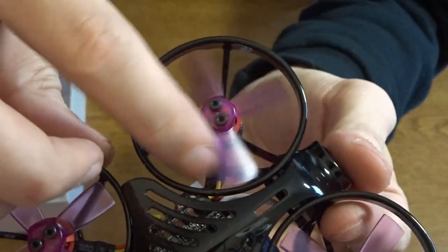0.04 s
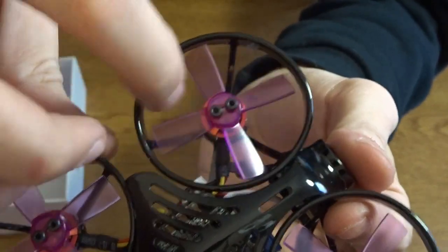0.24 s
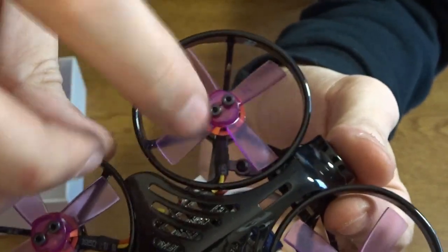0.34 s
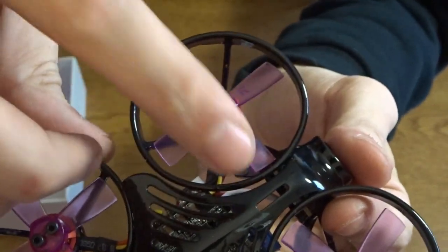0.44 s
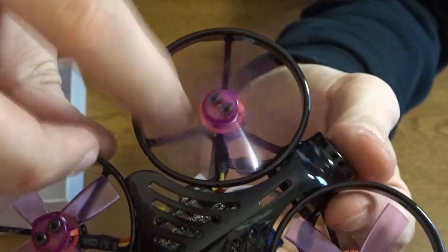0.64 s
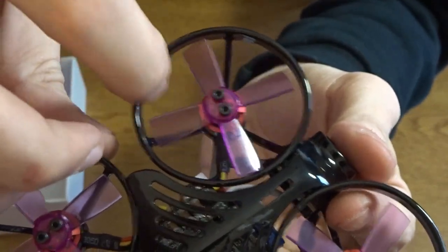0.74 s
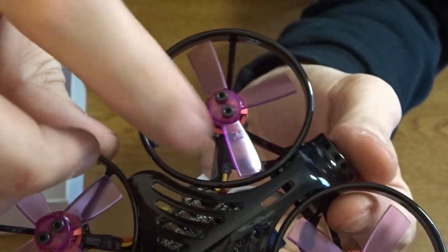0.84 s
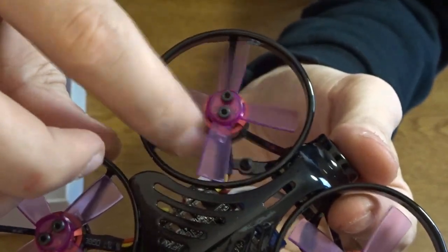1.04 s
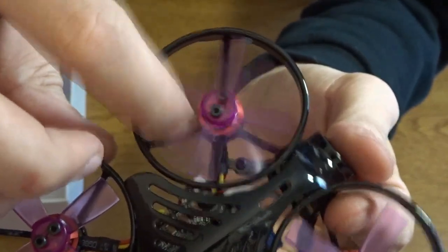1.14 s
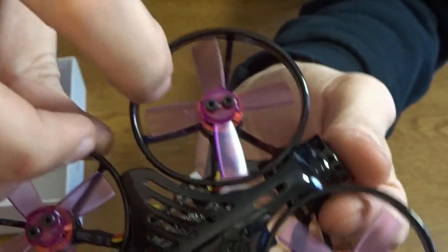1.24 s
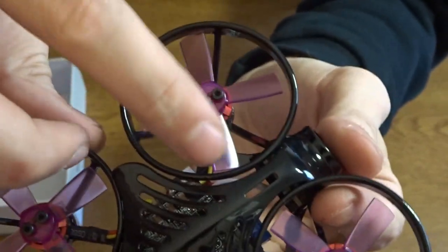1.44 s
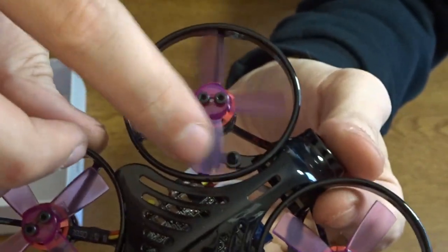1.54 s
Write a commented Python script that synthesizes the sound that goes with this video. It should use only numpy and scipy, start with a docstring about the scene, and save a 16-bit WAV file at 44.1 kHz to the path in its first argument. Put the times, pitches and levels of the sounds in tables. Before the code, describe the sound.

Close up in a small quiet room, plastic propeller blades click and twang under a finger three times at an even pace, with tiny rattles against the guard, faint skin rubs and a very low airy hum.

```python
"""A finger turns the plastic propeller of a small drone three times, close by in a quiet room.
Fan-like hum and hiss, shaped noise and wavering sines, lie faintly under everything. Skin first rubs softly.
In each turn the nail ticks on a blade, which it damps, then scrapes over the edge with a burst of noise;
the blade snaps free and rings as decaying sines. The loose propeller knocks on its guard twice after
the first turn and once after the second. Faint rubs and thuds of the hand recur, and a short room tail follows."""
import sys
import numpy as np
from scipy import signal
from scipy.fft import rfft, irfft
from scipy.io import wavfile

SR = 44100
rng = np.random.default_rng(int(sys.argv[2]) if len(sys.argv) > 2 else 0)


def wav_record(signal):
    """Record a signal, one row per channel, as 16-bit PCM in the file named by sys.argv[1]."""
    frames = np.transpose(np.atleast_2d(signal))
    bounded = np.clip(frames, -1, 1)
    # unit amplitude maps onto the largest positive 16-bit level
    quanta = np.round(bounded * 32767).astype(np.int16)
    wavfile.write(sys.argv[1], SR, quanta)


N = 70560
T = np.arange(N) / SR  # time [s]
OVERTONE_HZ, OVERTONE_T60_S = 4338, 0.059  # second long mode of the free blade


def undb(db):
    """Level definition: decibels to amplitude ratio."""
    return 10 ** (np.asarray(db) / 20)


def spectrum_gain(colour):
    """Spectral envelope: gain per FFT bin, interpolated in dB over log frequency."""
    hz, db = np.array(colour).T
    f = np.maximum(np.fft.rfftfreq(N, 1 / SR), 1)
    return undb(np.interp(np.log(f), np.log(hz), db))


def noise(colour):
    """Spectral shaping: white Gaussian noise filtered to a colour and scaled to rms 1."""
    white_spectrum = rfft(rng.standard_normal(N))
    y = irfft(white_spectrum * spectrum_gain(colour), N)
    return y / np.std(y)


def decay(age, t60):
    """Exponential damping: amplitude falls by 60 dB in every t60."""
    return np.exp(-np.log(1000) * age / t60)


def fade(start, t60):
    """Free decay: silence until the start, then exponential damping."""
    return (T >= start) * decay(np.maximum(T - start, 0), t60)


def swell(start, length):
    """Gradual contact: a half-sine rise and fall."""
    return np.sin(np.pi * np.clip((T - start) / length, 0, 1))


def mode(start, hz, t60, rise=0.00021, hold=0):
    """Damped resonance: a sine that rises, holds and decays exponentially."""
    age = np.maximum(T - start, 0)
    onset = 1 - np.exp(-age / rise)
    return np.sin(2 * np.pi * hz * age) * onset * decay(np.maximum(age - hold, 0), t60)


def ring(start, modes, scatter_db):
    """Modal superposition: each blow shares its strength a little differently among the modes."""
    total = 0
    for hz, db, t60 in modes:
        gain = undb(db + scatter_db * rng.standard_normal())
        delay = rng.random() / hz  # up to one period
        total = total + gain * mode(start + delay, hz, t60)
    return total


def burst(colour, env):
    """Amplitude modulation: noise under an rms envelope, scaled to exactly the envelope's energy."""
    y = noise(colour) * env
    return y * np.linalg.norm(env) / np.linalg.norm(y)


def click(colour, start):
    """Impulsive contact: a causal minimum-phase pulse of the given colour plus a rough noise decay."""
    rough_t60_s, rough_db = 0.0076, -2  # level against the pulse
    # folding the cepstrum onto positive times makes the pulse causal
    cepstrum = irfft(np.log(spectrum_gain(colour)), N)
    folded = 2 * cepstrum * (T > 0) * (T < T[-1] / 2)
    pulse = irfft(np.exp(rfft(folded)), N)
    rough = burst(colour, fade(start, rough_t60_s))
    placed = np.roll(pulse, int(start * SR)) / np.linalg.norm(pulse)
    return placed + undb(rough_db) * rough / np.linalg.norm(rough)


def stereo(mid, side):
    """Mid-side sum and difference: left and right from the common and the differing part."""
    return np.array([mid + side, mid - side])


def background(waver=0.11):
    """Broadband flow noise and phase-modulated tones: air and a wavering hum, a little to the right."""
    # noise spectra common to both ears and differing between them: (frequency [Hz], relative density [dB])
    air_mid = [(25, -46), (70, -31.5), (180, -21.5), (270, -15), (370, -5), (470, -9.5), (560, 1),
               (640, -2), (850, -1.5), (1080, -13.5), (1300, -4), (1600, -7.5), (2100, -15.5), (2900, -22),
               (5000, -21.5), (9000, -25.5), (15500, -25.5)]
    air_side = [(25, -57), (110, -34), (220, -25.5), (370, -7.5), (600, -7), (800, 2), (1080, -11.5),
                (1500, -5), (2100, -9), (2800, -21), (7500, -29), (10000, -44), (15500, -56)]
    # hum tones: (frequency [Hz], rms level before the left-right balance [dB])
    hum_tones = [(350, -72), (389, -64)]
    # spectrum of the rush in the right ear: (frequency [Hz], relative level [dB])
    fan_colour = [(300, -27), (700, -4), (1000, -31), (1350, 9.5), (1650, 12.5), (2100, -28), (5000, -62)]
    air_mid_db, air_side_db, fan_db = -57, -58, -61
    left_db = -0.5  # left against right
    drift = [(1, 0), (6, 0), (30, -40), (200, -120)]  # slow phase noise: (frequency [Hz], relative level [dB])
    hum = 0
    for hz, db in hum_tones:
        phase = 2 * np.pi * (hz * T + rng.random()) + waver * noise(drift)  # waver: rms [rad]
        hum = hum + undb(db) * np.sqrt(2) * np.sin(phase)
    air = stereo(undb(air_mid_db) * noise(air_mid) + hum, undb(air_side_db) * noise(air_side))
    balance = undb(np.array([[left_db], [-left_db]]) / 2)
    fan = undb(fan_db) * noise(fan_colour) * np.array([[0], [1]])  # right only
    return air * balance + fan


def room(x):
    """Diffuse reverberation: convolution with decaying noise, nearly the same in both ears."""
    # spectrum of the tail: (frequency [Hz], relative level [dB])
    tail_colour = [(100, -10), (600, -15), (850, -15), (1300, 3), (2500, 8), (3600, 2.5), (4350, -5),
                   (5200, 2.5), (6500, -1), (9000, 1), (12000, -5), (15500, -4)]
    t60_s, gap_s, tail_db, side_db = 0.3, 0.0031, -13.5, -11.5
    tails = [noise(tail_colour) * fade(gap_s, t60_s) for _ in range(2)]
    mid, side = (signal.fftconvolve(x, h / np.linalg.norm(h))[:N] for h in tails)
    return undb(tail_db) * stereo(mid, undb(side_db) * side)


def handling():
    """Friction and soft contact: skin rubs on plastic and the holding hand shifts with a thud."""
    # rubs and thuds: (start [s], length [s], peak rms level [dB])
    brushes = [(0.023, 0.021, -60.5), (0.994, .05, -67), (1.17, 0.03, -60)]
    thuds = [(0.208, .035, -77), (0.678, .035, -80), (0.784, 0.051, -74.5), (1.19, 0.029, -84)]
    # their noise spectra: (frequency [Hz], relative level [dB])
    brush_colour = [(1500, -22), (3300, -17), (4300, 7.5), (5500, -8), (9500, -16), (12000, 7.5),
                    (15000, -28)]
    thud_colour = [(30, -9), (70, -21), (115, 20), (170, -13), (400, -35), (2000, -70)]
    rubs = sum(undb(db) * noise(brush_colour) * swell(t, length) for t, length, db in brushes)
    return rubs + sum(undb(db) * noise(thud_colour) * swell(t, length) for t, length, db in thuds)


def touches():
    """Damped impact: the nail lands with a thin tick and the finger quickly damps the blade."""
    # landings of the nail: (time [s], relative level [dB])
    landings = [(0.1212, -34), (0.6304, -34), (1.0761, -29)]
    # the blade while the nail holds it: (frequency [Hz], relative level [dB], t60 [s])
    held_modes = [(1830, -13.5, 0.028), (3534, -7, 0.018), (4570, -17, .02), (6070, -10.5, 0.0095),
                  (6740, -15, 0.014), (9500, -12, 0.011), (12900, -2, .009)]
    # spectrum of the tick: (frequency [Hz], relative level [dB])
    tick_colour = [(1500, -32.5), (3400, -18.5), (4600, -18), (7000, -14), (8600, -27), (11000, -11),
                   (12000, 8.5), (12900, -2.5), (13700, -30), (15500, -28)]
    out = 0
    for t, db in landings:
        held_ring = undb(0.2) * ring(t, held_modes, scatter_db=0.9)
        tick = undb(13.0) * click(tick_colour, t)
        out = out + undb(db) * (held_ring + tick)
    return out


def body(start, modes):
    """Impulse response: a hard blow wakes short plastic modes and a faint buzz of the loose frame."""
    # spectrum of the buzz: (frequency [Hz], relative level [dB])
    buzz_colour = [(500, -17), (2400, -3.5), (3300, -6), (5000, 3), (9000, 0), (13500, -0.5), (15500, -1)]
    buzz_db, buzz_t60_s = -19.5, 0.11
    buzz = undb(buzz_db) * burst(buzz_colour, fade(start, buzz_t60_s))
    return undb(1.5) * ring(start, modes, scatter_db=0.2) + buzz


def knocks():
    """Collision of resonators: hard clicks on the guard also wake the blade's overtone."""
    # blows of the freed propeller: (time [s], relative click level [dB], overtone level [dB])
    blows = [(0.2269, -22, -36.5), (0.7019, -24, -33.5), (0.3224, -44, -43)]
    # the guard, struck by a blade: (frequency [Hz], relative level [dB], t60 [s])
    guard_modes = [(4420, -14.5, 0.053), (4600, -13, 0.037), (6280, -8, .014), (7700, -11.5, 0.011),
                   (8270, -20, 0.016), (11220, -13, 0.014), (11580, -4, 0.017)]
    # spectrum of the click: (frequency [Hz], relative level [dB])
    knock_colour = [(60, -59), (500, -27), (1100, -7.5), (2400, -14), (3500, -31), (4500, -11.5), (6500, 3),
                    (9000, -5.5), (11600, 6), (12600, 0), (15500, -8)]
    out = 0
    for t, click_db, overtone_db in blows:
        blow = undb(11) * click(knock_colour, t) + undb(-2.1) * body(t, guard_modes)
        overtone = undb(overtone_db) * mode(t, OVERTONE_HZ, OVERTONE_T60_S)
        out = out + undb(click_db) * blow + overtone
    return out


def flicks():
    """Release of elastic energy: a scrape over the edge, a snap with one chatter, the freed blade's ring."""
    # releases: (snap time [s], relative snap level [dB], scrape level [dB], bending level [dB],
    # overtone level [dB], bending t60 [s])
    releases = [(0.213, -23, -24, -30, -30.5, 0.23), (0.6785, -23.5, -54, -32, -22, 0.22),
                (1.1882, -25.5, -26, -31, -32, 0.31)]
    # short modes of the propeller: (frequency [Hz], relative level [dB], t60 [s])
    prop_modes = [(2604, -25, 0.022), (3703, -14, 0.025), (4040, -19, 0.045), (4940, -14.5, 0.023),
                  (5360, -29, .012), (6070, -8.5, 0.018), (6300, -18, .016), (7520, -13, 0.018),
                  (8600, -21, 0.0093), (10900, -21, 0.0099), (11760, -7, 0.015), (11900, -13, .01),
                  (14000, -27, .012)]
    # spectra of the contact noises: (frequency [Hz], relative level [dB])
    snap_colour = [(60, -28), (500, -27), (1100, -10.5), (2100, -18), (3100, -17.5), (4000, -8), (6200, -3),
                   (8500, -10), (11800, -2), (14500, -1.5), (15800, -8.5)]
    scrape_colour = [(3000, -19), (6000, -10), (9500, -45), (10800, -11), (11600, 17), (12800, -0.5),
                     (15500, -22)]
    scrape_lead_s = 0.001187  # the nail starts sliding this long before the snap
    chatter_s, chatter_db = 0.0028, -9.5  # the edge catches the nail once more
    bend_hz, bend_rise_s, bend_hold_s = 758.3, 0.0016, 0.021  # first long mode of the free blade
    out = 0
    for t, snap_db, scrape_db, bend_db, overtone_db, bend_t60 in releases:
        slip = t - scrape_lead_s
        scrape_env = np.sqrt(np.abs(swell(slip, 1.4 * scrape_lead_s)))
        scrape = undb(scrape_db) * burst(scrape_colour, scrape_env)
        crack = click(snap_colour, t) + undb(chatter_db) * click(snap_colour, t + chatter_s)
        snap = undb(snap_db) * (undb(12.5) * crack + body(t, prop_modes))
        bend = undb(bend_db) * mode(slip, bend_hz, bend_t60, bend_rise_s, bend_hold_s)
        overtone = undb(overtone_db) * mode(slip, OVERTONE_HZ, OVERTONE_T60_S, rise=0.00028)
        out = out + scrape + snap + bend + overtone
    return out


def scene():
    """Superposition: the propeller in the middle, its room tail and the background."""
    prop = touches() + flicks() + knocks() + handling()
    return prop + room(prop) + background()


def record(dry):
    """Band limiting: a steep elliptic low-pass cuts the top of the spectrum."""
    top_hz = 15750
    low_pass = signal.ellip(8, 0.2, 70, top_hz, fs=SR, output="sos")  # ripple, stopband [dB]
    return signal.sosfilt(low_pass, dry)


dry = scene()
out = record(dry)
wav_record(out)
```